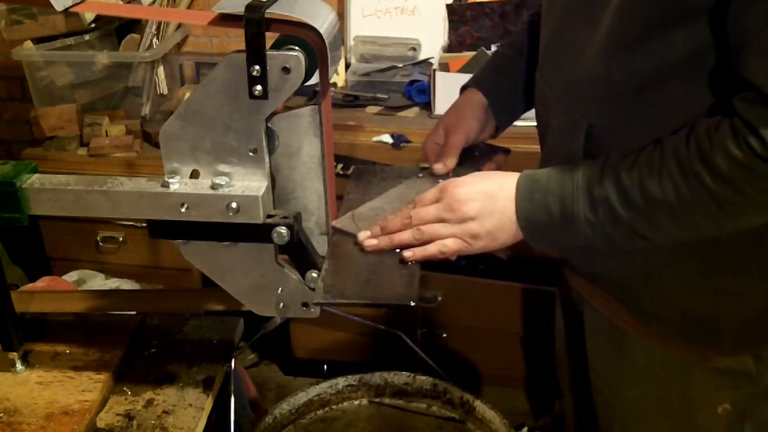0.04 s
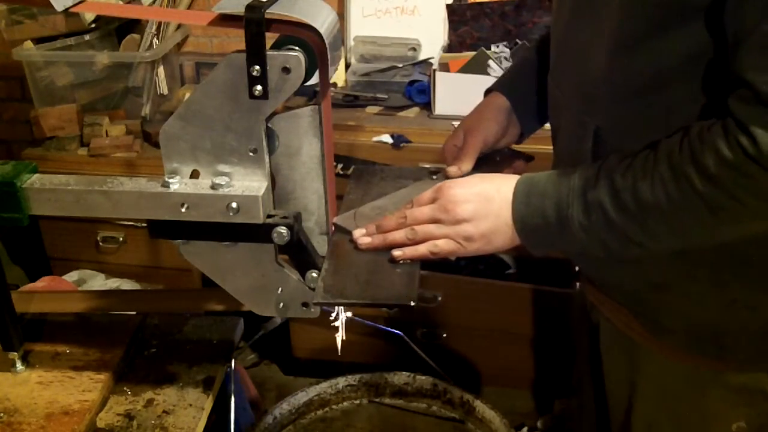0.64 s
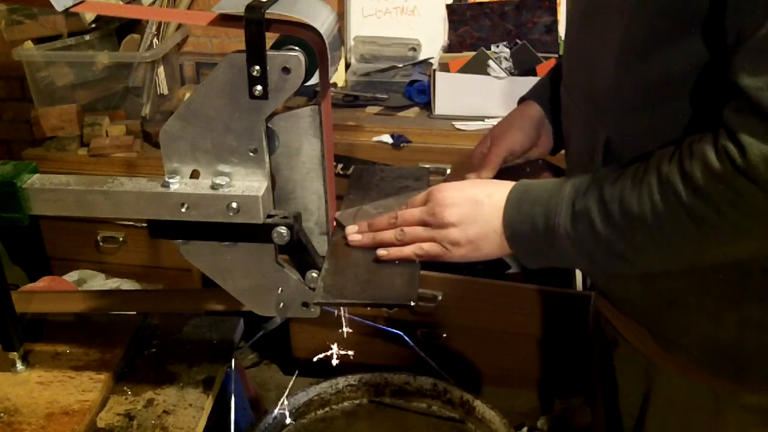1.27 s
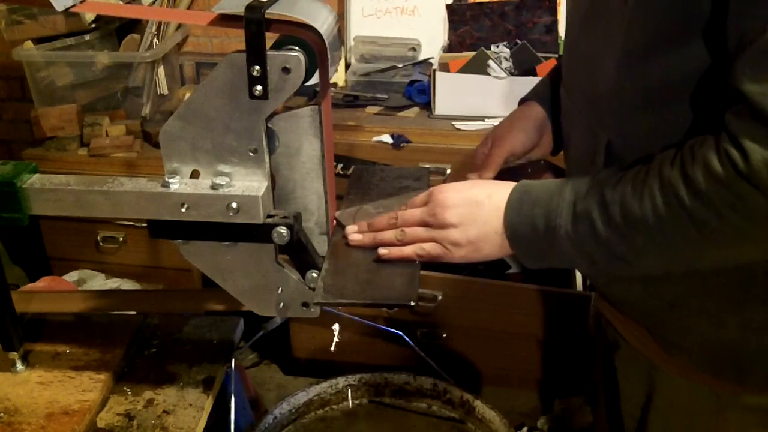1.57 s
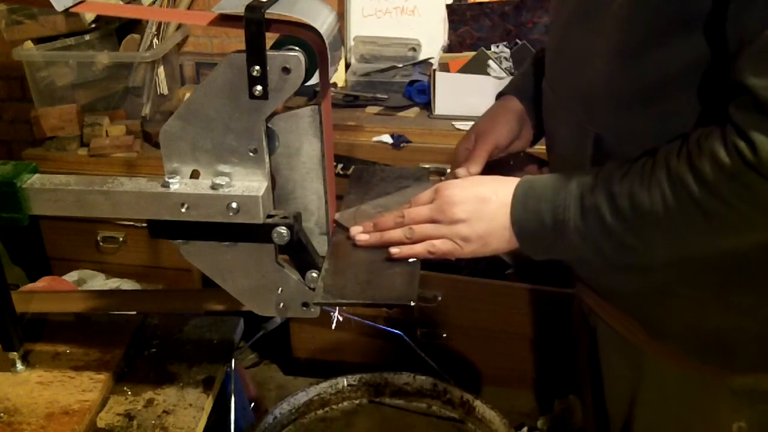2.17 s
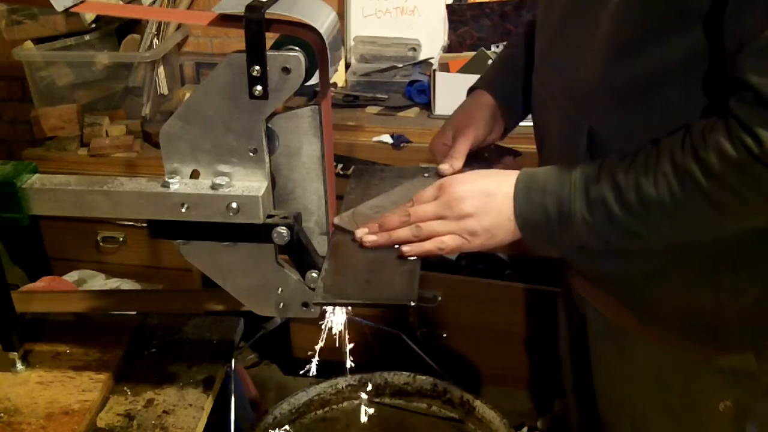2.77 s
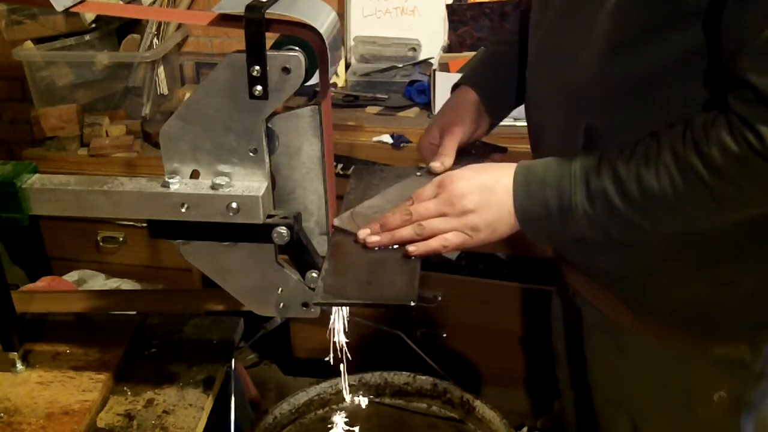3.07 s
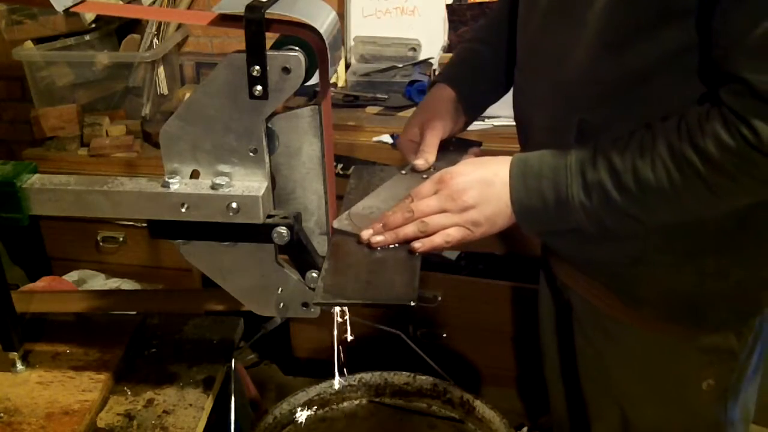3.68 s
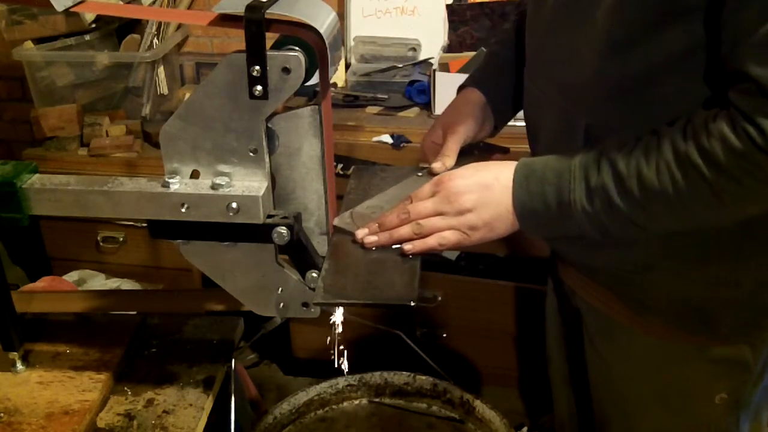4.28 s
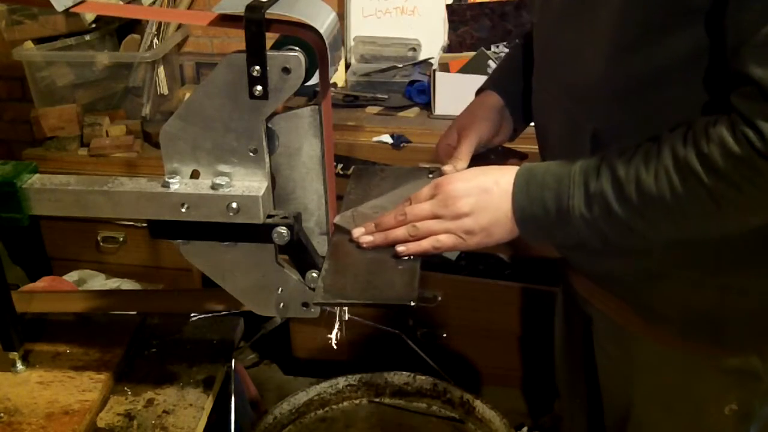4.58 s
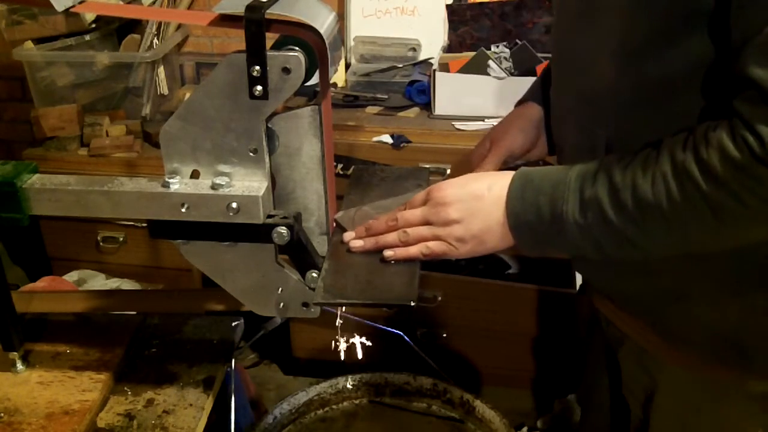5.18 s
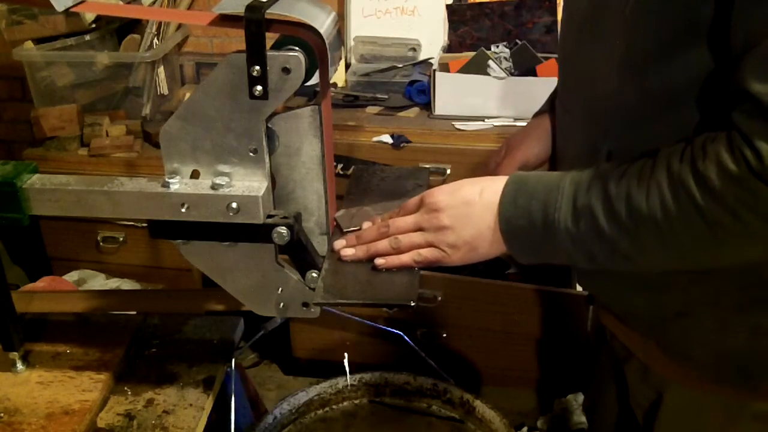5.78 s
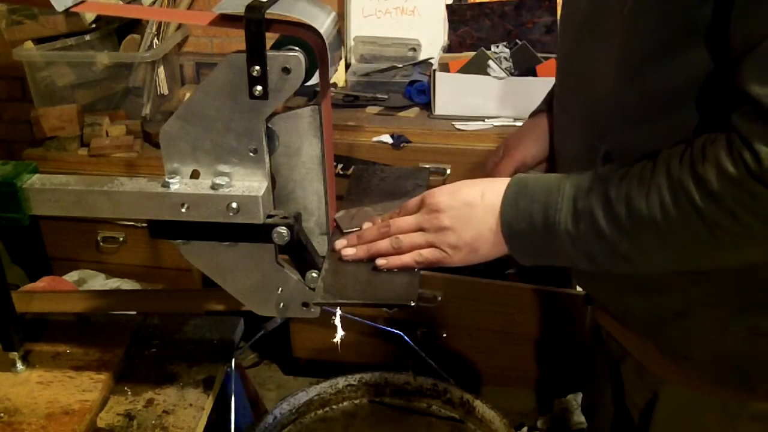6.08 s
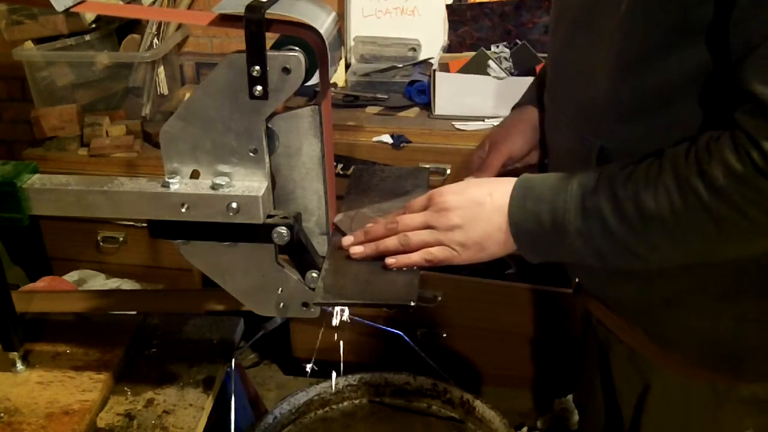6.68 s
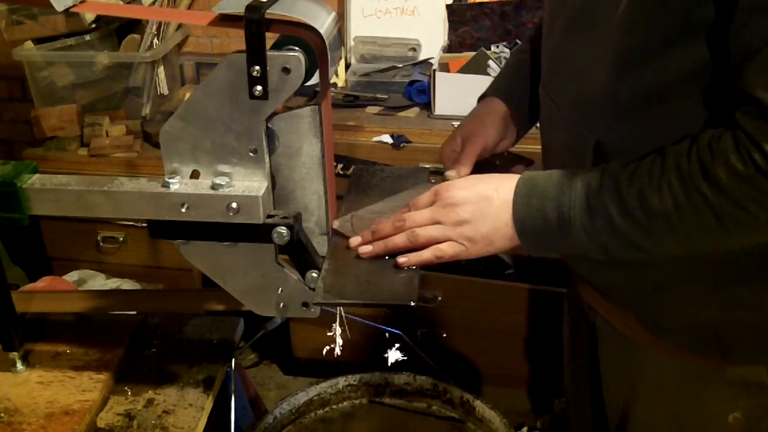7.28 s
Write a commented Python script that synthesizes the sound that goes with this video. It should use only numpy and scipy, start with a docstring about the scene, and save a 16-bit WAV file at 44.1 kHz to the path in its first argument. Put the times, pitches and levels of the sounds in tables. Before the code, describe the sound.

A steel slab is held against a running belt grinder, making a continuous gritty hiss with a fast, slight chatter. The metal rings and sings in several high tones that shift as the slab slides back and forth along the belt. A low machine hum and rumble sit underneath, swelling with a harder press near the middle and again near the end. The sound is close, in a small workshop with little echo.

```python
"""A steel slab is held against a running belt grinder in a small workshop. From the start the grit, coming
round slowly changed on every lap, hisses in the cut and drives slab and frame into resonance over a hum;
slack spots make it chatter, and stick-slip friction makes it sing. The contact slides from the tip most
of the way to the heel by 2 s, changing which modes sound, and is back by 4 s after a hard press.
It reaches the heel near 6 s; on the way back the hands press again and the low drone swells."""
import sys
import numpy as np
from scipy import signal
from scipy.fft import rfft, irfft, next_fast_len
from scipy.io import wavfile

SR = 44100
rng = np.random.default_rng(int(sys.argv[2]) if len(sys.argv) > 2 else 0)


def transcribe(signal):
    """Save signal, clipped to [-1, 1], as a 16-bit WAV file at the path in sys.argv[1]."""
    frames = np.atleast_2d(signal).T
    limited = np.clip(frames, -1, 1)
    pcm = np.round(limited * 32767).astype(np.int16)
    wavfile.write(sys.argv[1], SR, pcm)


N = 328104


def from_db(db):
    """Decibels to amplitude gain."""
    return 10 ** (np.asarray(db) / 20)

def rms_one(x):
    """Normalise to an rms of 1."""
    return x / np.sqrt(np.mean(x ** 2) + 1e-20)

def in_time(rows):
    """Linear interpolation of a (time [s], value) curve at every sample."""
    return np.interp(np.arange(N) / SR, *np.transpose(rows))

def swell(level_db):
    """A level curve as a gain around its own mean."""
    return from_db(level_db - np.mean(level_db))

def drift(per_s):
    """Band-limited noise: a slow wander of rms 1."""
    return rms_one(signal.resample(rng.standard_normal(int(per_s * N / SR) + 2), N))

def butterworth(x, hz, kind, order=2):
    """A filter with a maximally flat passband."""
    return signal.sosfilt(signal.butter(order, hz, kind, fs=SR, output="sos"), x)

def coloured(x, spectrum):
    """Spectral shaping by a table of (frequency [Hz], gain [dB])."""
    hz, gain_db = np.transpose(spectrum)
    bins_hz = np.maximum(np.arange(N // 2 + 1) * SR / N, 1)
    return irfft(rfft(x) * from_db(np.interp(np.log(bins_hz), np.log(hz), gain_db)), N)

def resonance(x, hz, width_hz):
    """A damped oscillator: two poles, gain 1 at the peak."""
    r = np.exp(-np.pi * width_hz / SR)
    poles = [1, -2 * r * np.cos(2 * np.pi * hz / SR), r * r]
    return signal.lfilter(np.array([1, 0, -1]) * (1 - r * r) / 2, poles, x)

def along_edge(along_db, place):
    """Mode shape: gain at the contact, from levels at even places between tip and heel."""
    return from_db(np.interp(place, np.linspace(0, 1, len(along_db)), along_db))

def body(force, modes, place):
    """Modal superposition: each mode is driven as strongly as it moves at the contact."""
    return sum((-1) ** k * resonance(force * along_edge(along_db, place), hz, width_hz)
               for k, (hz, width_hz, *along_db) in enumerate(modes))

def belt_surface(laps, kept):
    """Correlated roughness: each lap's random heights keep a share of the lap before."""
    lap = laps.astype(int)
    since_seam = np.arange(N) - np.searchsorted(lap, lap)
    heights = rng.standard_normal((lap[-1] + 1, SR // 6))
    for k in range(1, len(heights)):
        heights[k] = kept * heights[k - 1] + np.sqrt(1 - kept ** 2) * heights[k]
    return heights[lap, since_seam]

def patches(laps, length_s, kept):
    """Smoothed roughness: sharper and duller stretches of the belt; rms 1."""
    r = np.exp(-1 / (length_s * SR))
    return rms_one(signal.lfilter([1], [1, -2 * r, r * r], belt_surface(laps, kept)))

def grit(laps, kept, size_spread_db):
    """Broadband forcing by the cutting grains: most are small, a few stand proud; rms 1."""
    sizes = from_db(size_spread_db * np.clip(belt_surface(laps, kept), -3, 3))
    return rms_one(belt_surface(laps, kept) * sizes)

def slab(laps, place, bite_db):
    """Forced resonance: the steel rings under grains whose contact is too soft for the top treble."""
    # hand-damped modes: (frequency [Hz], width [Hz], level at four places from tip to heel [dB])
    modes = [(1079, 52, -14, -16, -16, -12.5), (1153, 89, -14, -14.5, -10.5, -7.5),
             (1190, 67, -17, -13, -8.5, -5.5), (1263, 17, -32, -20, -13, -11.5),
             (1357, 28, -12.5, -15, -14, -12), (1405, 26, -16, -19, -16, -12),
             (1457, 63, -18.5, -16.5, -14, -13), (1576, 22, -20, -22, -19, -14),
             (1663, 51, -19, -21, -16, -15.5), (1801, 40, -15.5, -18, -11.5, -15.5),
             (1941, 38, -16, -20.5, -14, -16.0), (2024, 43, -13, -20.5, -15.5, -14),
             (2118, 40, -11.5, -16.5, -15, -17.5), (2254, 37, -19, -19, -18, -16),
             (2387, 102, -21.5, -19.5, -18.5, -17.5), (2587, 28, -19, -17, -17.5, -17),
             (2687, 21, -20, -11.5, -17, -18), (2804, 26, -11.5, -11, -10.5, -12.5),
             (2930, 34, -14, -11, -13, -13), (2970, 26, -15, -12, -13, -13),
             (3038, 31, -14, -13, -13, -12.5), (3119, 20, -14, -10, -9, -12),
             (3175, 57, -21, -13, -15.5, -16), (3322, 54, -14.5, -14, -17, -16),
             (3470, 56, -13.5, -13.5, -16.5, -9.5), (3620, 32, -19, -8.5, -14.5, -11),
             (3680, 40, -10.5, -18.5, -14.0, -14.5), (3774, 32, -10, -14.5, -15, -18),
             (3824, 30, -15, -16, -19, -18), (3940, 134, -17, -19.5, -24.5, -24),
             (4147, 140, -19.0, -20.5, -23.5, -22.0), (5300, 780, -36.5, -36.0, -31.5, -27),
             (5680, 144, -26, -21.5, -19.5, -17.5), (6671, 572, -30.5, -31, -35, -33.0),
             (8250, 130, -29, -33, -39, -35)]
    force = grit(laps, kept=.52, size_spread_db=3) * from_db(.9 * bite_db)
    return from_db(.65) * body(butterworth(force, 10500, "low"), modes, place)

def frame(laps, place, bite_db):
    """Forced vibration: the belt's coarse, lasting lumps make the frame and work rest rumble."""
    # frame modes: (frequency [Hz], width [Hz], level at four places from tip to heel [dB])
    modes = [(253.4, 24, -25.5, -23, -26.5, -25), (317, 26.4, -25, -25, -23, -20),
             (369.3, 19.4, -30.5, -24, -22, -23), (428, 28, -23, -28, -27, -36),
             (515, 13, -28, -34, -23, -18), (563, 18, -31, -20.5, -23, -22),
             (737, 18, -17.5, -30, -26, -19), (795, 16, -17.5, -20.5, -19, -15.5),
             (834, 23, -19, -18.5, -17.5, -15), (887, 3.4, -14, -14, -27, -15)]
    force = grit(laps, kept=.6, size_spread_db=-1.5) * from_db(1.5 * bite_db)
    return from_db(.87) * body(force, modes, place)

def singing(place, grip_db):
    """Stick-slip oscillation: modes saturate into tones of wandering phase, pulsing with the grip."""
    # bowed modes: (frequency [Hz], width [Hz], level at four places from tip to heel [dB])
    modes = [(1081, 27, -37, -38.3, -39.2, -37.2), (1172, 60, -60, -58, -48, -39),
             (1385, 24, -35.7, -40, -33, -40), (1683, 16, -46, -55, -56, -52),
             (1968, 24, -43, -58, -50, -56), (2035, 44, -43, -62, -62, -58),
             (2955, 34, -51, -37.8, -45, -50), (3048, 31, -48, -32.8, -41.5, -40.5),
             (3808, 29, -32.8, -40.5, -51, -56), (5690, 60, -70, -56, -42, -46)]
    softness = .1
    out = np.zeros(N)
    for hz, width_hz, *along_db in modes:
        band = resonance(resonance(rng.standard_normal(N), hz, width_hz), hz, width_hz)
        ring = signal.hilbert(band, next_fast_len(N))[:N]
        saturated = ring.real / np.sqrt(abs(ring) ** 2 + softness * np.var(ring))
        out += rms_one(saturated) * along_edge(along_db, place)
    return out * rms_one(from_db(2.3 * grip_db))

def hiss(laps, bite_db, sharpness):
    """Abrasion noise: a steady rush from the backing below, fine and ever new chips above."""
    # colour of the cut: (frequency [Hz], gain [dB])
    spectrum = [(25, -40), (60, -43), (100, -39), (170, -29.5), (300, -32), (620, -29), (1000, -22),
                (1600, -22.5), (2200, -22.5), (3300, -21.5), (4000, -21.5), (4900, -27), (7000, -37),
                (10500, -41), (11600, -44), (13500, -65.5)]
    split_hz = 1100
    backing = butterworth(grit(laps, kept=.55, size_spread_db=-.5), split_hz, "low")
    chips = butterworth(grit(laps, kept=.27, size_spread_db=2), split_hz, "high")
    return from_db(.04) * coloured(backing + chips * sharpness * from_db(.63 * bite_db), spectrum)

def chatter(laps):
    """Amplitude modulation: the grip sags as each slack spot passes; dB around its mean."""
    # slack spots: (position [laps], half length [laps], change of grip [dB])
    spots = [(.03, .06, -2.8), (.45, .06, -3.2), (.76, .06, -1.1)]
    grip_db = np.zeros(N)
    for at, half_length, depth_db in spots:
        distance = (laps - at + .5) % 1 - .5
        grip_db += depth_db * np.exp(-(distance / half_length) ** 2)
    return grip_db - grip_db.mean()

def drone(laps, place, pressure_db):
    """Periodic forcing: lasting waves in the belt hum in the frame at harmonics of the lap rate."""
    # belt tones: (harmonic number before rounding, level at four places from tip to heel [dB])
    tones = [(29, -59.5, -54, -57.5, -52.5), (31, -51, -50.5, -54, -58), (37, -71, -56, -58, -58),
             (44, -58.5, -51.5, -48, -52.5), (45, -66, -55, -61, -68), (51, -52, -53, -54.5, -62),
             (61, -62, -56, -66, -58), (62, -61, -59, -62, -61), (66.6, -79, -67, -66, -67),
             (96, -58, -56, -64, -57), (99.8, -53.5, -56, -57, -50), (105.8, -53.5, -47.5, -58, -58)]
    # swell of the lowest tones, while the rest follow the pressure: (time [s], level [dB])
    low_drone = [(0, -9), (.9, 2), (1.5, -5), (3.6, -5), (4.3, -4), (4.9, 1.5), (6.5, -2.5), (7.15, 7),
                 (7.44, -7)]
    low_db, wander_db = in_time(low_drone), 2
    out = np.zeros(N)
    for harmonic, *along_db in tones:
        gain = along_edge(along_db, place) * swell(low_db if harmonic < 35 else .82 * pressure_db)
        gain *= from_db(wander_db * drift(per_s=3))
        out += np.sqrt(2) * gain * np.sin(2 * np.pi * (round(harmonic) * laps + rng.random()))
    return out

def motor():
    """Shaft rotation and magnetic force give a faint steady hum."""
    # shaft tone and magnetic tone: (frequency [Hz], level [dB])
    tones = [(49.3, -74), (100, -64.5)]
    t = np.arange(N) / SR
    return sum(np.sqrt(2) * from_db(db) * np.sin(2 * np.pi * (hz * t + rng.random())) for hz, db in tones)

def workshop(x, t60_s, wet_db):
    """Destructive interference weakens a few pitches; the cluttered room adds a short diffuse tail."""
    # cancellations between bench and walls: (frequency [Hz], width [Hz], gain [dB])
    dips = [(219, 15, -6.5), (494, 12, -0.5), (1243, 28, -1), (3580, 36, -9)]
    for hz, width_hz, dip_db in dips:
        x = x - (1 - from_db(dip_db)) * resonance(x, hz, width_hz)
    t = np.arange(SR // 2) / SR
    tail = rng.standard_normal(len(t)) * from_db(-60 * t / t60_s) * (t > .004)
    reverberation = signal.fftconvolve(x, tail / np.linalg.norm(tail))[:N]
    wet = from_db(wet_db)
    return (x + wet * reverberation) / np.sqrt(1 + wet ** 2)

def scene():
    """Superposition of grinding and hum; harder pressing brings more rumble, drone and hiss."""
    # belt speed: (time [s], rate [laps/s])
    speed = [(0, 8.35), (2.1, 8.33), (3.6, 8.37), (5.4, 8.385), (6.2, 8.35), (7.44, 8.37)]
    # how hard the hands press the slab on the belt: (time [s], level [dB])
    pressure = [(0, 0), (0.85, -0.5), (1.35, 0.9), (1.75, -1.5), (2.2, -1), (2.6, 0), (2.95, -1), (3.2, 3),
                (3.8, -0.5), (4.7, 1.5), (5.4, -0.4), (6.8, 0), (7.1, 2.5), (7.44, 1.5)]
    # contact along the slab's edge: (time [s], place [0 = tip, 1 = heel])
    path = [(0, 0), (.6, .07), (1.15, .33), (1.6, .66), (1.9, .72), (2.4, .58), (2.77, .33), (3.1, .14),
            (3.85, 0), (4.3, .11), (4.75, .15), (5.1, .34), (5.5, .85), (5.9, .98), (6.3, .82), (6.62, .36),
            (7, .17), (7.44, .09)]
    laps = np.cumsum(in_time(speed)) / SR
    pressure_db, place = in_time(pressure), in_time(path)
    grit_patches = patches(laps, length_s=.0009, kept=.68)
    waves = patches(laps, length_s=.0035, kept=.6)
    bite_db = 1.05 * grit_patches + .85 * waves  # depth of the cut
    chatter_db = chatter(laps)
    slab_bite_db = bite_db + np.interp(place, [0, 1], [.45, 1.25]) * chatter_db  # more chatter at the heel
    noise_bite_db = bite_db + .19 * chatter_db
    grinding = (swell(.036 * pressure_db) * slab(laps, place, slab_bite_db)
                + swell(1.75 * pressure_db) * frame(laps, place, noise_bite_db)
                + singing(place, grip_db=chatter_db + .45 * waves)
                + hiss(laps, noise_bite_db, sharpness=swell(.52 * pressure_db)))
    humming = drone(laps, place, pressure_db) + motor()
    return (workshop(grinding, t60_s=.31, wet_db=-15.5) + humming)[None]

def record(dry):
    """Band limiting: the deep bass is thinned, the treble notched and the top cut; the ends fade quickly."""
    # narrow treble nulls: (frequency [Hz], width [Hz])
    nulls = [(7870, 810), (9830, 1040), (11130, 950), (11850, 650)]
    cutoff_hz = 14000
    faded = dry * np.interp(np.arange(N), [0, 90, N - 300, N - 20], [0, 1, 1, 0])
    out = butterworth(faded, 35, "high")
    for hz, width_hz in nulls:
        out = butterworth(out, [hz - width_hz / 2, hz + width_hz / 2], "stop", order=3)
    return signal.sosfilt(signal.ellip(10, .2, 80, cutoff_hz, fs=SR, output="sos"), out)


dry = scene()
out = record(dry)
transcribe(out)
```